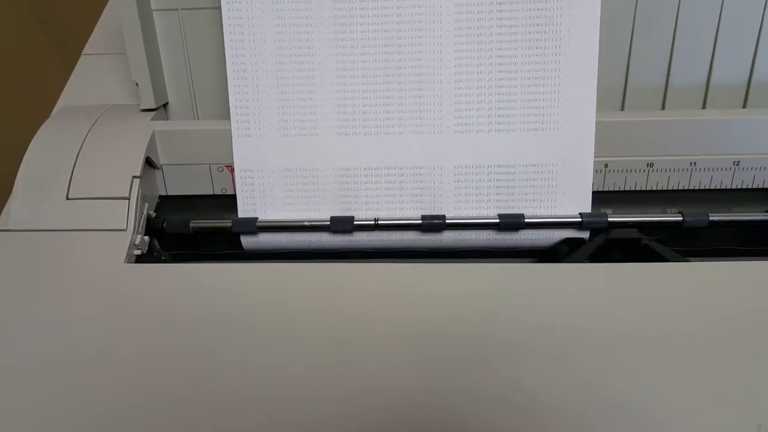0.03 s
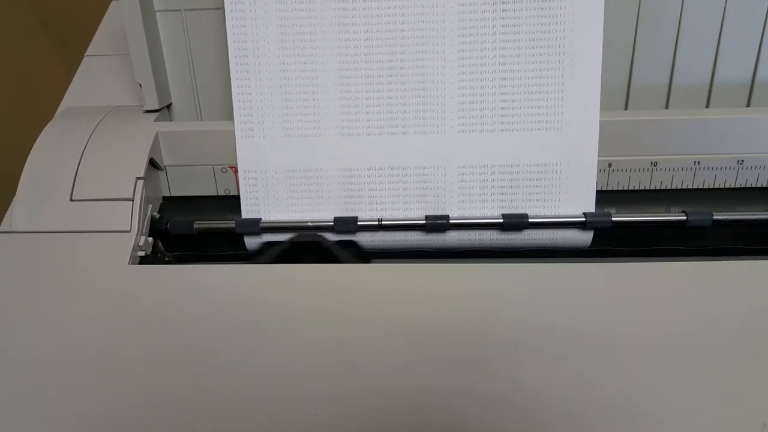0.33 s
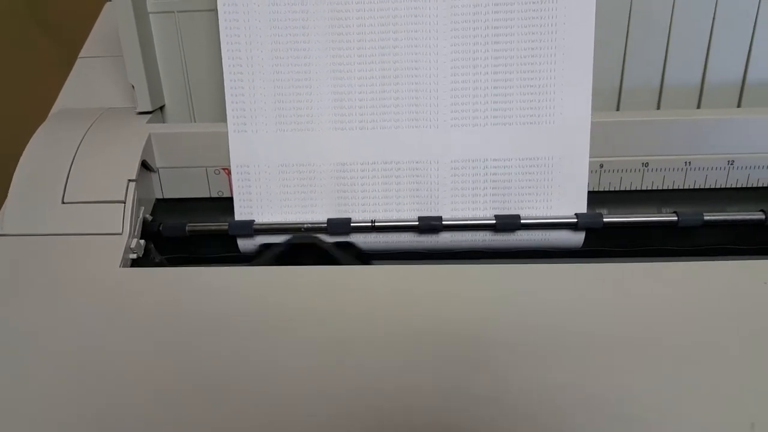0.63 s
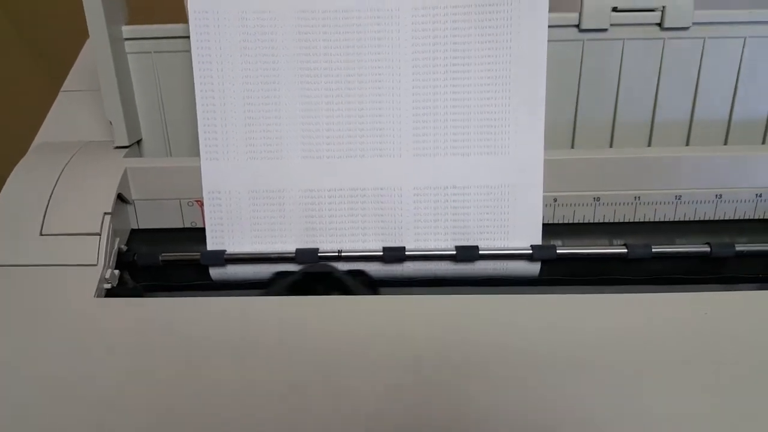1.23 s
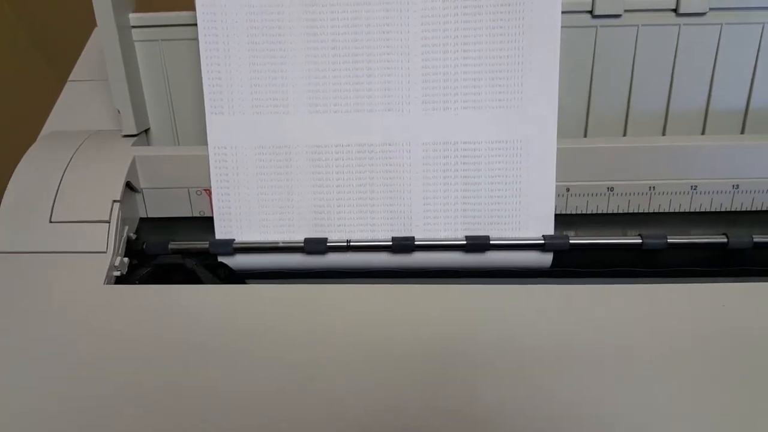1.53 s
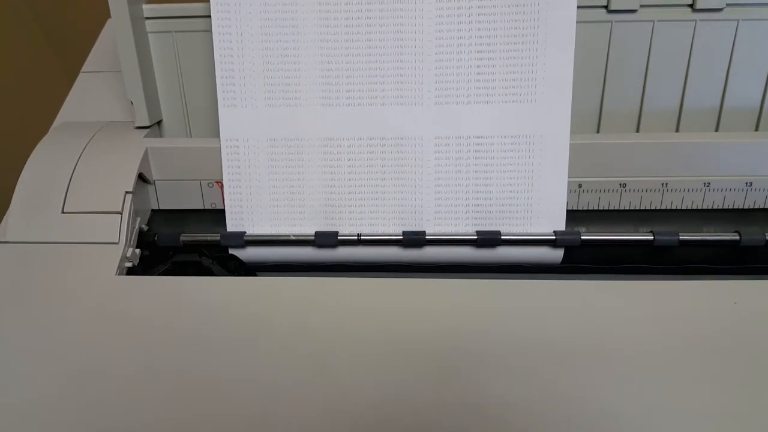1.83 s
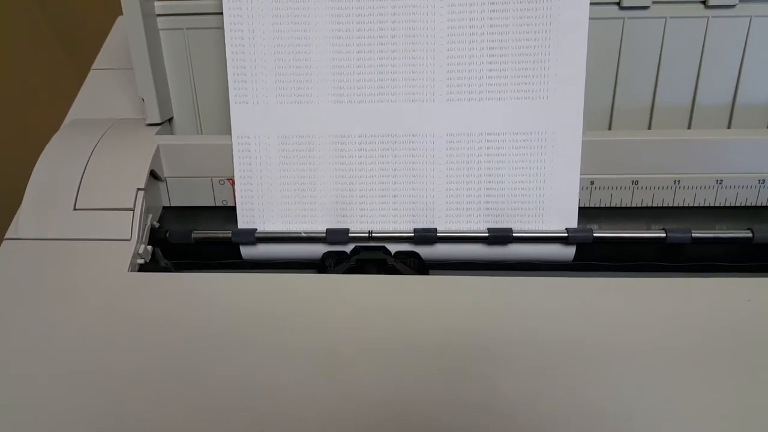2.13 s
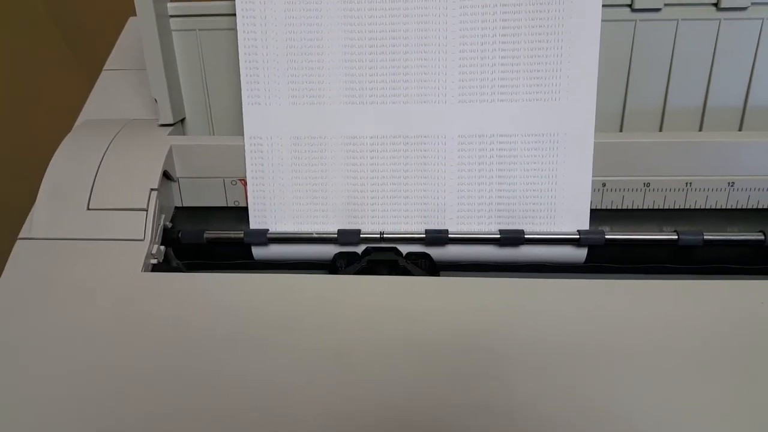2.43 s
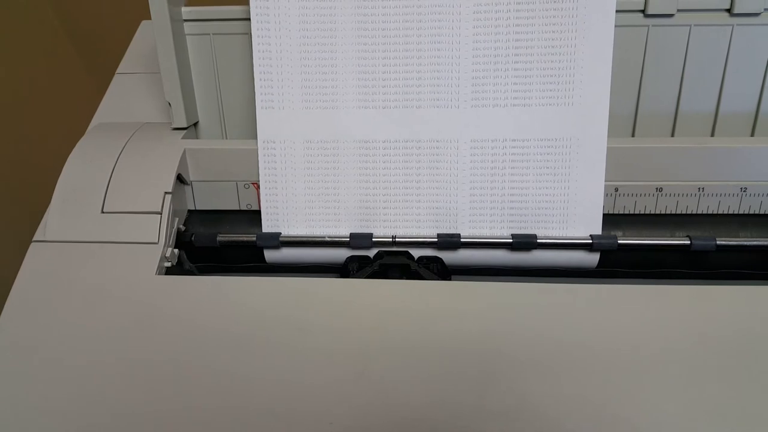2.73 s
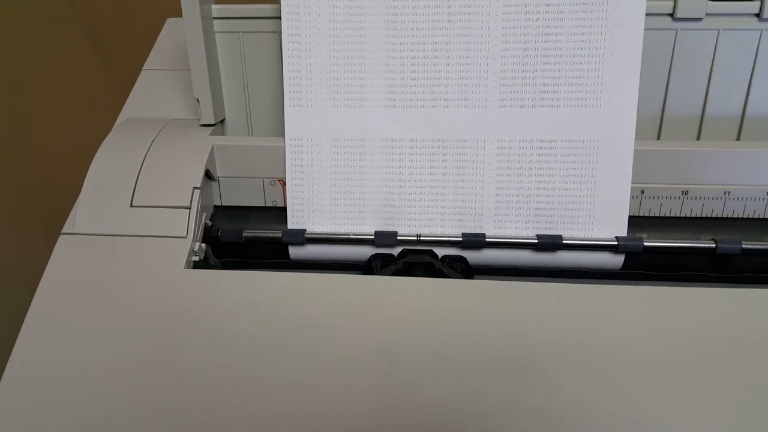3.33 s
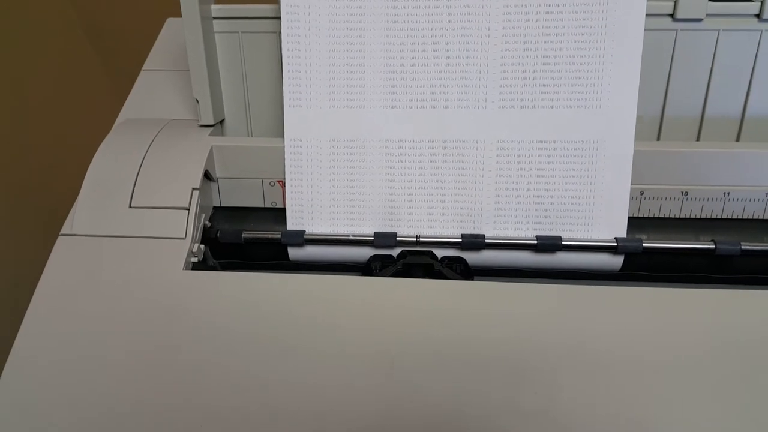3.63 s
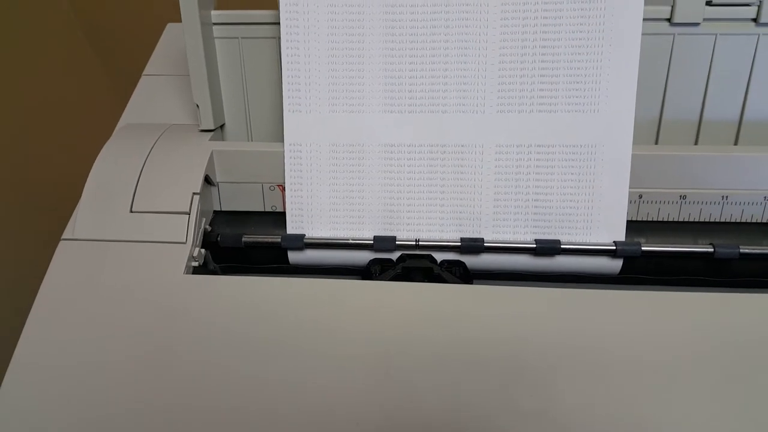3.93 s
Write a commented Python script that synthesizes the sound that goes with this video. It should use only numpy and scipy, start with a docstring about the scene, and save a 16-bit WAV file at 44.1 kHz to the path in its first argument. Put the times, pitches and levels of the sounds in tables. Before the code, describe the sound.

A dot matrix printer, heard close in a small quiet room, prints three harsh, high buzzing bursts at about 0.2, 0.6 and 1.1 seconds, each a third of a second long. Plastic clunks and tiny squeaks mark the carriage turns. From 1.5 seconds the paper feeds with softer rapid ticking. Around 2 seconds the carriage parks with a brief whine between two clunks. Then only faint room noise remains.

```python
"""A dot matrix printer

Three lines are printed in a small quiet room, heard from just above the lid. Needle impacts excite
the head and platen while a stepper motor whines; the case shudders and clunks in its own modes at
each turn of the carriage. Then the paper ticks forward, the carriage parks and only the room is left."""
import sys
import numpy as np
from scipy import signal
from scipy.fft import rfft, irfft
from scipy.io import wavfile

SR = 44100
rng = np.random.default_rng(int(sys.argv[2]) if len(sys.argv) > 2 else 0)


def materialize(psi):
    """Save the field psi as 16-bit PCM at rate SR to the path in sys.argv[1].

    A 1-D psi becomes a single channel; in a 2-D psi each row is a channel.
    """
    bounded = np.clip(np.atleast_2d(psi).T, -1, 1)
    quanta = np.round(bounded * 32767).astype(np.int16)
    wavfile.write(sys.argv[1], SR, quanta)


N = 176400
TIME = np.arange(N) / SR

# Printed lines. Each row: start in seconds, end in seconds, gain in dB.
PRINT_LINES = [(-.32, 0.006, -2.5), (0.156, .483, -0.5), (.633, 0.954, 1.1), (1.108, 1.436, 0.5)]
# One list a line. Each row: time in seconds, gain of the needles in dB, gain of the platen in dB.
STRIKE_GAINS = [
    [(0.17, -20, -25), (0.25, -19, -22.5), (0.258, -22, -23), (0.334, -17.5, -22.5), (0.388, -22.5, -25.5),
     (0.414, -19, -26.5), (0.48, -21, -34)],
    [(0.645, -22, -38), (0.651, -21.5, -31), (0.739, -22, -30), (0.757, -21.5, -24.5), (0.95, -21, -25.5)],
    [(1.12, -20, -24.5), (1.306, -20.5, -24.5), (1.396, -22, -34.5), (1.418, -20, -28),
     (1.43, -22.5, -33.5)],
]
# Stereo balance of the printing. Each row: frequency in Hz, left minus right in dB.
PRINT_BALANCE = [(60, 8), (130, -1.5), (290, -8), (640, -0.5), (1410, 0.5), (3100, 0.5), (6820, -2.5),
                 (15000, 3)]
# Spectra of the impacts and noises. Each row: frequency in Hz, relative spectral density in dB.
HEAD_SPECTRUM = [(350, -46), (600, -15.5), (660, -5), (726, -18), (799, -6), (1050, -19), (1600, -8),
                 (1910, -10.5), (3390, -9.5), (3630, -8), (4640, -14), (5460, 1), (6170, -2), (9170, -4),
                 (10400, -9.5), (12900, -7), (15600, -13)]
PLATEN_SPECTRUM = [(100, -22.5), (600, -15), (850, -4), (1100, -3.5), (1600, 4), (2100, -15.5), (2700, 7.5),
                   (3700, 8.5), (4500, 6.5), (5300, 19), (6300, -20.5), (16000, -20)]
RATTLE_SPECTRUM = [(35, -35), (60, -21), (120, -7.5), (300, 1), (550, -3.5), (800, 4), (1200, -6),
                   (1800, 0), (2800, -6), (4000, -14.5), (7000, -26), (12000, -22), (16000, -25)]
CLICK_SPECTRUM = [(40, -14), (100, 6.5), (400, 8), (900, 13), (1800, 7), (3500, -17.5), (6000, 4),
                  (10000, 0), (16000, -8.5)]
THUD_SPECTRUM = [(35, -26.5), (70, -13), (130, 0.5), (250, 8), (420, -2.5), (600, -2), (800, -4.5),
                 (1200, -11), (2000, -16.5), (3000, -17.5), (5000, -37), (16000, -57)]
TICK_SPECTRUM = [(300, 13), (1600, -3), (3000, -0.5), (4600, -4), (5500, -8), (6700, 8), (8000, -1.5),
                 (10000, -3), (13000, -17.5), (16000, -29.5)]
GEAR_SPECTRUM = [(47, -28), (80, -12.5), (367, -1.5), (421, -36.5), (467, -1), (537, -16.5), (684, 2),
                 (1000, -16), (1460, -4), (1960, -9.5), (5000, -18.5), (6500, -51), (11000, -120)]
PAPER_SPECTRUM = [(500, -12), (3000, -5), (9000, 2), (13000, -4), (16000, -6)]
AIR_SPECTRUM = [(15, -48), (25, -21), (70, -1.5), (101, -10), (211, -4.5), (305, -12.5), (366, -9),
                (397, -20), (429, -16), (558, -19.5), (997, -21), (2140, -26), (2310, -26.5), (4710, -33.5),
                (6990, -34), (10700, -38.5), (13500, -35), (14600, -57.5)]
# Carriage runs. Each row: times of start, full speed, braking and stop in seconds,
# then the shudder in dB while speeding up, rolling and braking.
PRINT_RUNS = [(-.4, -.35, 0.0062, 0.085, -25, -30, -24.5), (.085, .122, 0.51, .552, -26.5, -36.5, -25.5),
              (.556, .615, .975, 1.036, -27.5, -33.5, -27), (1.04, 1.076, 1.53, 1.557, -26.5, -36, -31)]
PARK_RUNS = [(1.951, 2.02, 2.078, 2.138, -31, -33.5, -32)]
# Partials of the motor whines and of the hum. Each row: harmonic number, gain in dB.
PRINT_WHINE = [(1, -57.5), (2, -46)]
PARK_WHINE = [(3, -47.5), (4, -45.5), (5, -52), (6, -51), (7, -48), (9, -60), (10, -59)]
HUM_PARTIALS = [(2, -4), (3, -3), (4, -15)]
# Modes of the case. Each row: frequency in Hz, relative level in dB, T60 in seconds.
CASE_MODES = [(128, -10, 0.047), (157, 1.5, .2), (198.6, -6.5, .08), (235.2, 2, 0.15), (276, -1.5, 0.31),
              (291, -4, .12), (341, -12, .16), (484.6, -8.5, .16), (627, 1, .13), (668.2, 5, .09),
              (798, -14.5, .07), (1238, -17, .08), (1736, -6, 0.1), (2540, -13.5, .16), (3020, -15, .35)]
# Carriage turns, stops and starts. Each row: time in seconds, gains of case, thud, rail, click in dB.
CLUNKS = [(.086, -26, -22, -18, -29.5), (.549, -24.5, -18, -17, -30), (1.036, -22.5, -20, -17, -23),
          (1.478, -26, -26.5, -22, -40), (1.951, -27, -26, -28, -25), (1.959, -24.5, -25, -14.5, -23),
          (2.130, -26, -25.5, -26, -26.5)]
# Hums of the case. Each row: start in seconds, end in seconds, gain in dB.
HUMS = [(0.026, .125, -30.5), (0.503, 0.628, -25), (.98, 1.074, -29.5), (1.45, 1.543, -27),
        (1.558, 1.659, -34), (1.954, 2.042, -26.5)]
# Braking squeaks. Each row: time of the peak in seconds, level in dB.
SQUEAKS = [(.03, -33.5), (.525, -35.5), (1.004, -34), (1.457, -28), (2.102, -30.5)]
# Tones on reaching printing speed. Each row: start in seconds, level in dB.
LOCK_INS = [(.123, -36.5), (.601, -40.5), (1.077, -33)]
# Envelope of the paper feed's ticks. Each row: time in seconds, level in dB.
FEED_LEVELS = [(1.53, -54.5), (1.60, -54), (1.635, -47), (1.69, -45.5), (1.73, -48), (1.80, -47),
               (1.85, -52.5), (1.89, -39.5), (1.915, -69), (1.945, -49.5)]
# Whistles of the feed motor's drive. Each row: start in seconds, end in seconds, level in dB.
DRIVE_WHISTLES = [(.05, 0.156, -45.5), (0.525, 0.624, -53.5), (.99, 1.10, -46), (1.602, 1.70, -48)]
# Reverberation of the room. Each row: frequency in Hz, T60 in seconds.
ROOM_T60 = [(100, 0.18), (300, 0.64), (700, 0.34), (1500, 0.4), (4000, 0.28), (10000, 0.31), (16000, 0.27)]
# Likeness of the two ears' signals. Each row: frequency in Hz, correlation from 0 to 1.
COHERENCE = [(100, 0.93), (300, 0.88), (700, 0.62), (1500, 0.48), (3000, .15), (6000, 0), (16000, 0)]
# Faint electrical whines. Each row: frequency in Hz, level in dB.
IDLE_TONES = [(2283, -83.5), (6998, -94.5), (12581, -92.5)]

COLUMN_HZ, PARK_HZ = 1477.5, 534.3  # fundamentals of the motor when printing and parking
NEEDLES, GLYPHS, GLYPH_COLUMNS, DOT_CHANCE = 12, 14, 6, .4
NEEDLE_T60_S, PLATEN_T60_S, PLATEN_SPOTS = .0072, .031, 5
RAIL_HZ, RAIL_RISE_S, THUD_RISE_S, CLICK_T60_S = 665, .009, .0079, .016
FEED_HZ, TICK_T60_S, DRIVE_HZ = 192, .01432, 15550


def print_head(jitter_s=.00016, spread_db=1.5, head_db=3, platen_db=2):
    """Impact excitation: a needle strikes for each dot; the platen rings differently along the line."""
    columns = np.arange(int(N / SR * COLUMN_HZ) - 4)
    font = rng.random((GLYPHS, GLYPH_COLUMNS, NEEDLES)) < DOT_CHANCE
    text = rng.integers(0, GLYPHS, len(columns))
    dots = font[text[columns // GLYPH_COLUMNS], columns % GLYPH_COLUMNS]
    printing = sum(amp(db) * gate(start, end) for start, end, db in PRINT_LINES) * amp(wander(40))
    position = sum((-1) ** k * np.clip((TIME - start) / (end - start), 0, 1)  # to and fro, 0 to 1
                   for k, (start, end, _) in enumerate(PRINT_LINES))
    head, platen, blows = np.zeros((2, N)), np.zeros((2, N)), np.zeros(N)
    for k in range(NEEDLES):
        strikes = np.zeros(N)
        times = (columns + k / NEEDLES) / COLUMN_HZ + jitter_s * rng.standard_normal(len(columns))
        strengths = amp(spread_db * rng.standard_normal(len(columns)))
        strikes[(times * SR).astype(int)] = dots[:, k] * strengths
        strikes = unit_rms(strikes - strikes.mean()) * printing / np.sqrt(NEEDLES)
        head += convolve(strikes, dense_ring(NEEDLE_T60_S))
        blows += strikes
    times, head_gains, platen_gains = np.concatenate(STRIKE_GAINS).T
    head *= amp(np.interp(TIME, times, head_gains))
    blows *= amp(np.interp(TIME, times, platen_gains))
    for k in range(PLATEN_SPOTS):
        nearness = np.cos(np.pi / 2 * np.clip(position * (PLATEN_SPOTS - 1) - k, -1, 1))
        platen += convolve(blows * nearness, dense_ring(PLATEN_T60_S))
    out = amp(head_db) * shaped(head, HEAD_SPECTRUM) + amp(platen_db) * shaped(platen, PLATEN_SPECTRUM)
    left_db = lookup(PRINT_BALANCE, np.fft.rfftfreq(N, 1 / SR)) / 2
    return irfft(rfft(out) * amp([left_db, -left_db]), N)


def carriage(runs, top_hz, partials, whine_power, jolts_per_s=1500, rattle_db=-8):
    """Forced vibration: pitch follows speed; belt and gears shake the case most as speed changes."""
    speed, force = np.zeros((2, N))
    for start, cruise, brake, stop, up_db, roll_db, down_db in runs:
        speed += np.sin(np.pi / 2 * np.interp(TIME, [start, cruise, brake, stop], [0, 1, 1, 0]))
        force += (amp(up_db) * gate(start, cruise) + amp(roll_db) * gate(cruise, brake)
                  + amp(down_db) * gate(brake, stop))
    cycles = np.cumsum(top_hz * speed * (1 + .0022 * wander(80))) / SR
    whine = sum(amp(db + 2 * wander(45)) * rms_sine(k * cycles + rng.random((2, 1)) / 2)
                for k, db in partials)
    signs = rng.choice([-1., 1.], (3, N))
    jolts = unit_rms(signs * (rng.random((3, N)) < jolts_per_s / SR)) * force
    ring = case_ring()
    shudder = convolve(jolts[0], ring / np.linalg.norm(ring))
    rattle = amp(rattle_db) * shaped(correlate_ears(jolts[1:]), RATTLE_SPECTRUM)
    return whine * speed ** whine_power + shudder + rattle


def case_ring():
    """Modal superposition: after a blow the plastic case rings as a sum of damped cosines."""
    t = TIME[:SR // 2]
    return sum(amp(db - 60 * t / t60) * np.cos(2 * np.pi * hz * t) for hz, db, t60 in CASE_MODES)


def clunks():
    """Transient response: a carriage jolt gives a click, a case ring, a thud and a swelling rail tone."""
    out, ring = np.zeros((2, N)), case_ring()
    ring = .1 * ring / ring.std()
    t = TIME[:len(ring)]
    rail = swell(t / RAIL_RISE_S) ** 2.6 * np.sin(2 * np.pi * RAIL_HZ * t)
    for start, case_db, thud_db, rail_db, click_db in CLUNKS:
        click = shaped(stereo_white(len(t)) * amp(-60 * t / CLICK_T60_S), CLICK_SPECTRUM)
        thud = shaped(stereo_white(len(t)) * swell(t / THUD_RISE_S), THUD_SPECTRUM)
        clunk = amp(case_db) * ring + amp(thud_db) * thud + amp(rail_db) * rail + amp(click_db) * click
        first = round(start * SR)
        out[:, first:first + len(t)] += clunk
    return out


def case_hum(hz=81.6, sag_per_s=.7, flutter=.03):
    """Forced vibration: the case hums in slightly falling harmonics as the motors start and stop."""
    out = np.zeros(N)
    for start, end, db in HUMS:
        elapsed = np.clip(TIME, start, end) - start
        cycles = np.cumsum(hz * (1 - sag_per_s * elapsed + flutter * wander(44))) / SR
        hum = sum(amp(gain) * np.sin(2 * np.pi * (k * cycles + rng.random())) for k, gain in HUM_PARTIALS)
        out += amp(db) * gate(start, end, edge_s=.02) * hum
    return out


def brake_squeaks(hz=2750, fall_per_s=9.2, roughness_hz=380, width_s=.011):
    """Amplitude modulation: noise roughens a short whistle that falls as the carriage brakes."""
    out = np.zeros((2, N))
    for peak, db in SQUEAKS:
        t = np.clip(TIME - peak, -.1, .1)
        cycles = np.cumsum(hz * np.exp(-fall_per_s * t)) / SR
        whistle = amp(db) * np.exp(-(t / width_s) ** 2 / 2) * rms_sine(cycles)
        for ear in out:
            ear += whistle * wander(roughness_hz)
    return out


def motor_lock_ins(length_s=.034):
    """Periodic forcing: on reaching speed the motor sings at its step rate, twice the column rate."""
    envelope = sum(amp(db) * gate(start, start + length_s) for start, db in LOCK_INS)
    tone = np.sin(2 * np.pi * 2 * COLUMN_HZ * TIME + .3 * wander(150))
    return envelope * tone * amp(2.5 * wander(150))


def paper_feed(spread_db=1.5, limp_db=2.5, gears_db=-44.5, paper_db=-53.5):
    """Impulse train and friction: weak and strong motor steps tick over gear noise and sliding paper."""
    times, levels = np.transpose(FEED_LEVELS)
    step_times = np.arange(times[0], times[-1], 1 / FEED_HZ)
    count = len(step_times)
    step_db = spread_db * rng.standard_normal(N)[:count] + limp_db * (np.arange(count) % 2)
    steps = np.zeros(N)
    steps[(step_times * SR).astype(int)] = unit_rms(amp(step_db))
    steps *= amp(np.interp(TIME, times, levels)) * np.sqrt(SR / FEED_HZ)
    decay = amp(-60 * TIME[:2048] / TICK_T60_S)
    ticks = convolve(steps, decay / np.linalg.norm(decay)) * noise(TICK_SPECTRUM)
    friction = amp(gears_db) * noise(GEAR_SPECTRUM) + amp(paper_db) * noise(PAPER_SPECTRUM)
    return ticks + friction * gate(times[0], times[-1], edge_s=.02)


def drive_whistle(width_hz=330):
    """Sidebands: random modulation spreads the feed drive's very high tone into a narrow band."""
    envelope = sum(amp(db) * gate(start, end, edge_s=.02) for start, end, db in DRIVE_WHISTLES)
    return envelope * rms_sine(DRIVE_HZ * TIME) * np.array([wander(width_hz), wander(width_hz)])


def room_tail(size=32768, onset_s=.0021):
    """Reverberation: the diffuse field of a small room decays exponentially, each band at its rate."""
    hz, t, bands = signal.stft(stereo_white(size), SR, nperseg=256)
    bands = bands * amp(-60 * t / lookup(ROOM_T60, hz)[:, None])
    tail = signal.istft(bands, SR, nperseg=256)[1][:, :size] * np.clip(TIME[:size] / onset_s, 0, 1)
    return tail / np.linalg.norm(tail[0])


def background(air_db=-59):
    """Noise floor: steady broadband air noise lies under faint electrical pure tones."""
    whines = sum(amp(db) * rms_sine(hz * TIME + rng.random((2, 1))) for hz, db in IDLE_TONES)
    return amp(air_db) * noise(AIR_SPECTRUM) + whines


def amp(db):
    """Amplitude ratio of a level in decibels."""
    return 10 ** (np.asarray(db) / 20)


def unit_rms(x):
    """Normalisation to rms 1."""
    return x / np.sqrt(np.mean(x ** 2) + 1e-20)


def rms_sine(cycles):
    """Sinusoid of rms 1."""
    return np.sqrt(2) * np.sin(2 * np.pi * cycles)


def gate(start, end, edge_s=.003):
    """Trapezoidal window: 1 between two times, with linear ramps."""
    return np.clip(np.minimum(TIME - start, end - TIME) / edge_s + .5, 0, 1)


def swell(x):
    """Critically damped pulse, peaking at 1 where x is 1."""
    return x * np.exp(1 - x)


def wander(hz):
    """Random modulation: low-passed noise of rms 1."""
    low_pass = np.exp(-(np.fft.rfftfreq(N, 1 / SR) / hz) ** 2)
    return unit_rms(irfft(rfft(rng.standard_normal(N)) * low_pass, N))


def lookup(table, hz):
    """Interpolation on a logarithmic frequency axis."""
    frequencies, values = np.transpose(table)
    return np.interp(np.log(hz + 1), np.log(frequencies + 1), values)


def convolve(x, response):
    """Linear filtering by an impulse response, cut to the input's length."""
    return signal.fftconvolve(np.atleast_2d(x), np.atleast_2d(response), axes=1)[:, :x.shape[-1]]


def shaped(x, spectrum, size=4096):
    """Minimum-phase filtering by a response of energy 1 with the given spectrum."""
    log_gain = np.log(amp(lookup(spectrum, abs(np.fft.fftfreq(size, 1 / SR)))))
    response = np.fft.ifft(np.exp(np.conj(signal.hilbert(log_gain)))).real[:size // 2]
    return convolve(x, response / np.linalg.norm(response))


def correlate_ears(x):
    """Interaural coherence: two independent channels are mixed to be alike in the bass."""
    mid, side = rfft(x)
    coherence = lookup(COHERENCE, np.fft.rfftfreq(x.shape[1], 1 / SR))
    angle = np.arccos(np.clip(coherence, -1, 1)) / 2
    mid, side = mid * np.cos(angle), side * np.sin(angle)
    return irfft(np.array([mid + side, mid - side]), x.shape[1])


def stereo_white(size):
    """White noise, coherent between the ears in the bass."""
    return correlate_ears(rng.standard_normal((2, size)))


def noise(spectrum):
    """Coloured stereo noise of rms 1."""
    return unit_rms(shaped(stereo_white(N), spectrum))


def dense_ring(t60, size=2048):
    """Modal overlap: crowded modes ring as decaying noise, of energy 1 in each ear."""
    ring = correlate_ears(rng.standard_normal((2, size)) * amp(-60 * TIME[:size] / t60))
    return ring / np.linalg.norm(ring, axis=1, keepdims=True)


def scene(head_room_db=-5.5, body_room_db=-8):
    """Superposition: the printer's direct sound, its reverberation and the noise floor add."""
    head = print_head()
    body = carriage(PRINT_RUNS, COLUMN_HZ, PRINT_WHINE, whine_power=8)
    body += carriage(PARK_RUNS, PARK_HZ, PARK_WHINE, whine_power=.7)
    body += clunks() + case_hum() + brake_squeaks() + motor_lock_ins() + paper_feed() + drive_whistle()
    reverberation = convolve(amp(head_room_db) * head + amp(body_room_db) * body, room_tail())
    return head + body + reverberation + background()


def record(dry, cutoff_hz=15800):
    """Band limiting: a linear-phase low-pass removes the highest treble."""
    low_pass = signal.firwin(511, cutoff_hz, window=("kaiser", 9), fs=SR)
    return signal.oaconvolve(dry, low_pass[None], "same")


dry = scene()
out = record(dry)
materialize(out)
```